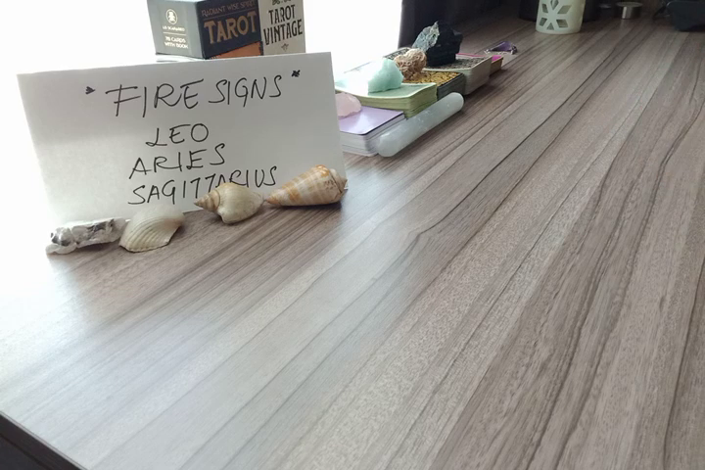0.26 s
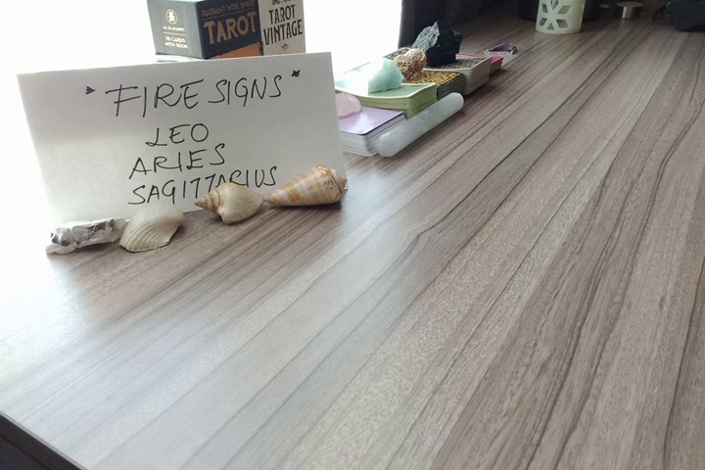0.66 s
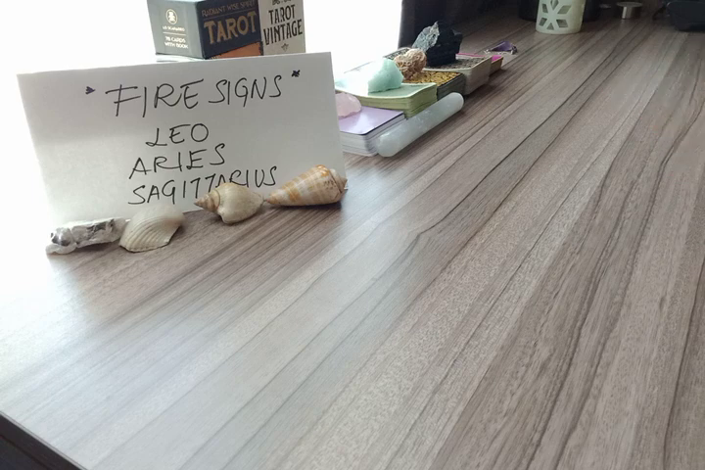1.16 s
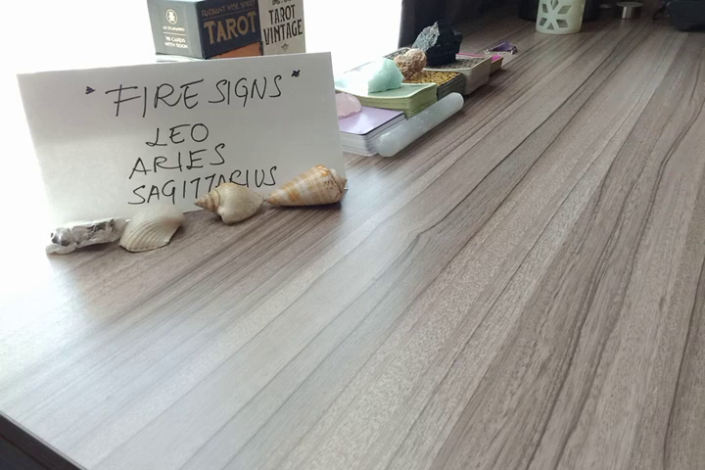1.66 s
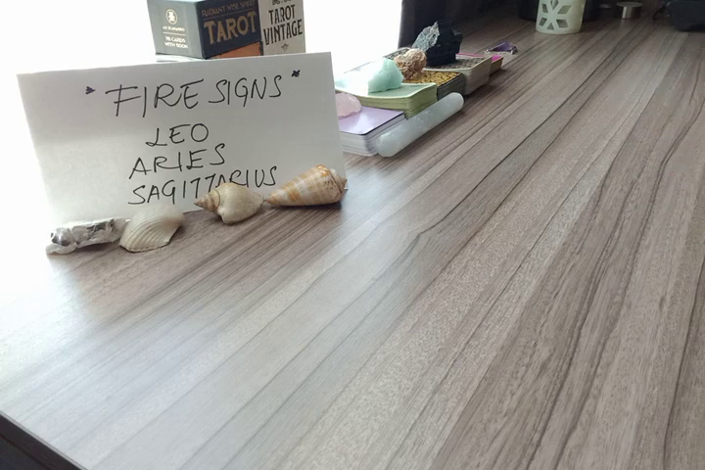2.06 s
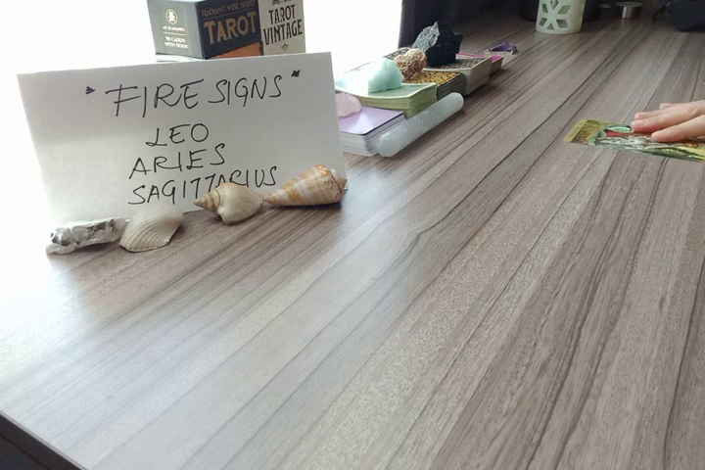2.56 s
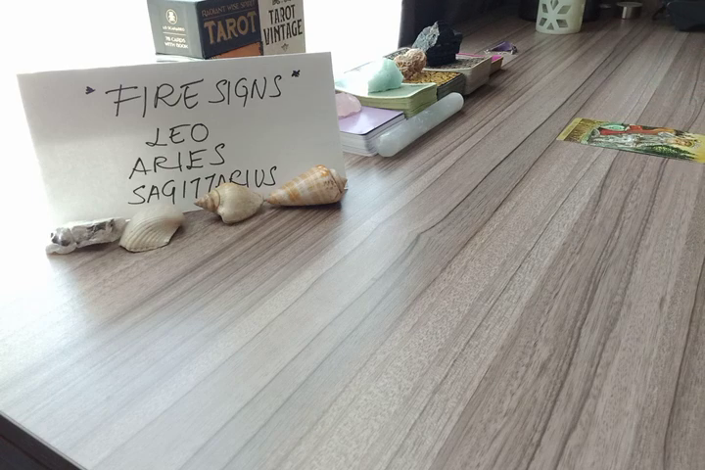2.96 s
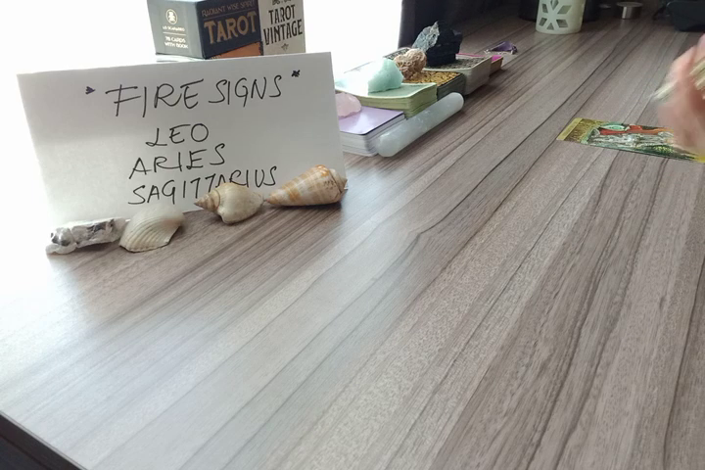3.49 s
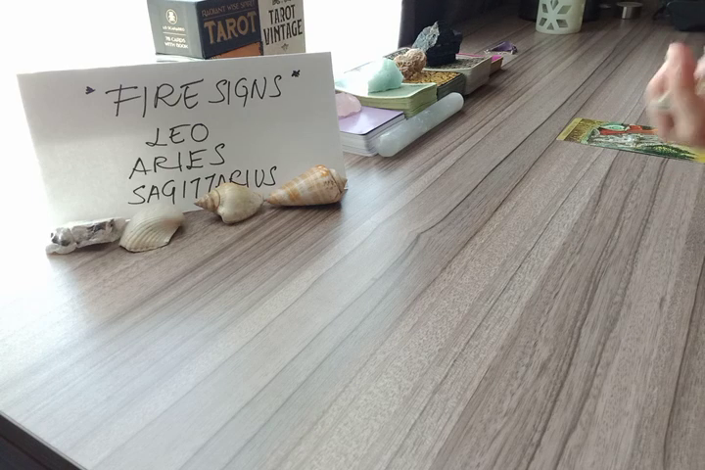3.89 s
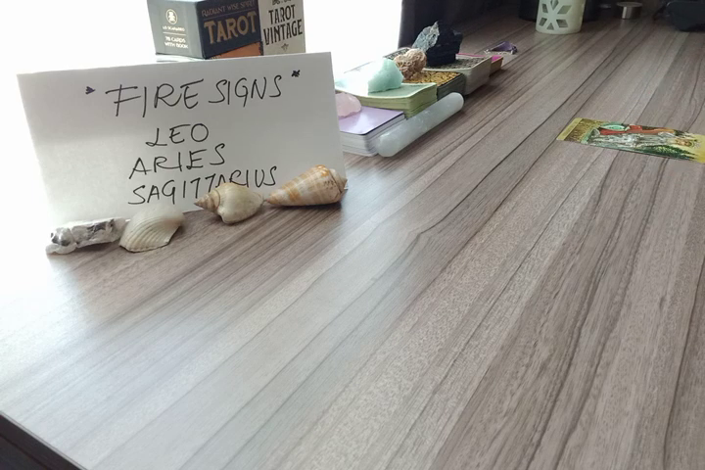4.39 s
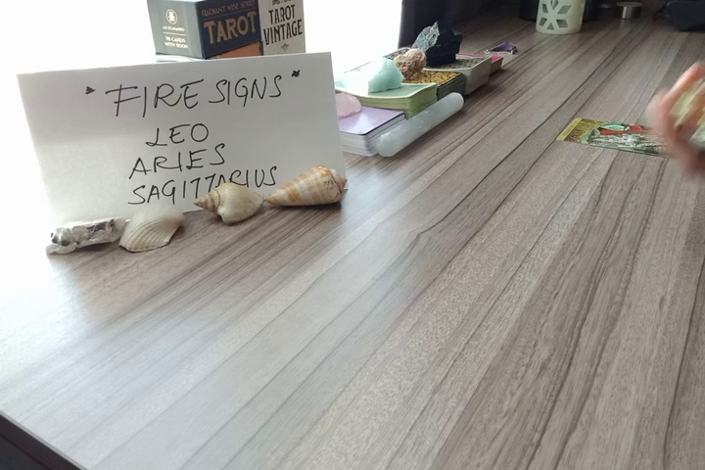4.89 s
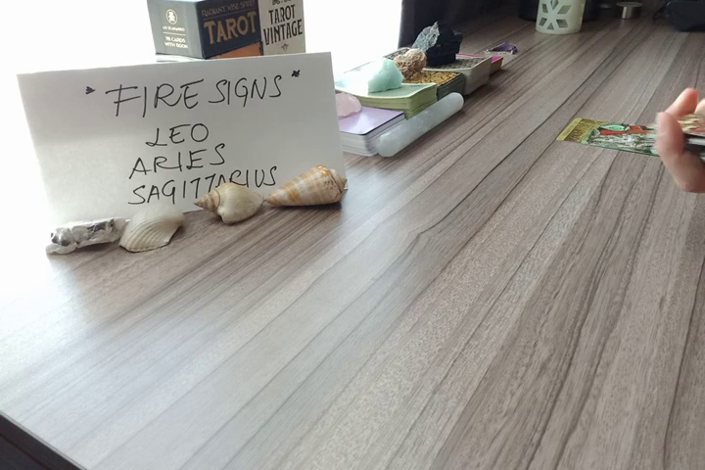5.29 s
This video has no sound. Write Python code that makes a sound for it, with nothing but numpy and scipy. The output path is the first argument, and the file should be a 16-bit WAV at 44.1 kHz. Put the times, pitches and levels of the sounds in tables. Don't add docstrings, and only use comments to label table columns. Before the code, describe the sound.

Stiff cards are shuffled in packets with sharp snaps and soft papery slides, one card laid on a wooden table, in a quiet room.

```python
import sys
import numpy as np
from scipy import signal
from scipy.fft import rfft, irfft, next_fast_len
from scipy.io import wavfile
from scipy.ndimage import uniform_filter1d

SR = 44100
rng = np.random.default_rng(int(sys.argv[2]) if len(sys.argv) > 2 else 0)


def voltage_ratio(level):
    return 10 ** (np.asarray(level, float) / 20)


def log_audio(samples):
    frames = np.atleast_2d(samples).T
    limited = np.clip(frames, -1, 1)
    pcm = np.round(limited * 32767).astype(np.int16)
    wavfile.write(sys.argv[1], SR, pcm)


N = 244314

# t/s, peak level/dB, card ring f/Hz, thud re peak/dB, crack re peak/dB
LANDINGS = [(0.1803, -18, 3300, -22, -2), (0.1813, -13.5, 2500, -25, -5), (0.3431, -22, 2420, -11, -7),
            (0.7105, -30.5, 4700, -24.5, -1), (0.7401, -25, 2550, -14, -3), (1.138, -35, 5930, -37, 7),
            (1.14, -14, 2600, -15, -13), (1.184, -26.5, 3180, -10, -7), (2.1741, -17.5, 3730, -14.5, -2.5),
            (2.3496, -23.5, 2930, -10, -7), (2.356, -24.5, 3380, -17, -5), (2.417, -26, 2945, -9, -3),
            (3.7791, -23.5, 4000, -13, 2), (3.9757, -27, 2880, -15.5, -7), (4.0294, -21, 2900, -14, -1),
            (4.154, -25.5, 2700, -5.5, 1.5), (4.5014, -9, 2770, -19, -16), (4.5053, -27, 7500, -13, 4),
            (4.8458, -26, 2900, -9.5, 3), (4.8557, -23, 2300, -9.5, -10), (5.181, -19, 3200, -20, -5),
            (5.1831, -18, 2230, -6, -13), (5.1864, -27, 3500, -10, -3), (5.5362, -28.5, 2330, -6.5, -9),
            (5.5392, -29, 2800, 1.5, 0)]
LANDING_T60_S = 0.0064
# t/s, peak level/dB, card ring f/Hz, thud re peak/dB
TICKS = [(0.136, -36, 5070, -24), (0.1488, -41, 3700, 0), (0.3348, -32.5, 3740, -4.5),
         (0.337, -37, 4600, -8), (0.4708, -45, 5130, -26), (0.5387, -40, 3300, -9.5),
         (0.8978, -30.5, 4670, -12), (1.3453, -42, 3300, 1), (1.3884, -44, 2700, -9),
         (2.335, -33.5, 3550, -4.5), (3.786, -30, 2690, -11), (3.807, -38, 3520, -23),
         (3.9545, -46, 5000, -29), (4.358, -42, 3320, -7), (4.684, -38, 7800, -34),
         (4.7032, -37, 3350, -13), (4.776, -46, 5730, -20), (4.8505, -24, 2830, -2),
         (5.0363, -35.5, 5100, -6.5), (5.283, -50, 4980, -27), (5.4283, -46, 6100, -26),
         (5.535, -26, 4150, -9.5), (0.1825, -21.5, 1980, -20), (0.1845, -28, 4900, -23),
         (0.191, -28.5, 1990, -13), (0.196, -36, 2600, -14), (4.4996, -33, 2800, -20),
         (4.503, -22, 7500, -24), (4.515, -35, 5000, -15), (2.178, -31, 4200, -16), (4.1605, -39, 5500, -8),
         (4.168, -38, 3800, -14), (5.367, -49, 2680, -14), (5.484, -52.5, 4500, -25),
         (0.595, -50.5, 3500, -22), (2.049, -53, 2900, -27), (0.7131, -27, 1980, -7.5),
         (4.694, -44, 2200, -6), (5.335, -46.5, 4540, 0), (.7118, -30, 4800, -22), (.7175, -30, 9000, -10),
         (0.7267, -41, 7000, -17), (.887, -45, 2800, -5), (1.163, -37, 5000, -7), (.369, -42, 3000, -5),
         (.3465, -33, 5240, -13)]
TICK_CRACK_DB, TICK_T60_S = -2, 0.0095
# t/s, body level/dB, hiss level/dB, fade/(dB/s)
SETTLES = [(0.0, -57, -59, 210), (0.186, -49, -48, 264), (0.349, -53, -72, 302), (0.719, -51.5, -58, 198),
           (0.879, -57, -64, 225), (1.145, -49, -58.5, 205), (2.181, -61, -74, 140),
           (2.376, -62.5, -70, 135), (2.422, -64, -66, 302), (3.798, -57.5, -69, 240),
           (4.036, -59, -68, 200), (4.172, -62.5, -74, 250), (4.511, -40, -49.5, 441),
           (4.861, -56, -70, 180), (5.191, -43, -48.5, 550)]
SETTLE_RUB_DB = -11.5
# start t/s, fastest t/s, end t/s, rub level/dB, hiss re rub/dB
DRAGS = [(-0.1, 0.0, 0.048, -57, -11), (0.013, 0.08, 0.53, -75.5, 12), (0.18, 0.246, 0.32, -64, -9),
         (0.36, 0.45, 0.7, -74, 8), (0.712, 0.822, 0.98, -70, 7.5), (1.174, 1.31, 1.5, -69.5, 1),
         (1.42, 1.5, 1.76, -80, -4), (3.55, 3.6, 3.7, -79, 1), (1.735, 1.97, 2.035, -65, -2.5),
         (2.036, 2.105, 2.17, -56, 0.5), (2.166, 2.25, 2.4, -77, -6), (2.33, 2.356, 2.427, -55.5, -13),
         (3.33, 3.52, 3.59, -76, 11.5), (3.768, 3.91, 3.91, -71, 14.5), (3.92, 3.967, 4.017, -59, 7.5),
         (4.02, 4.08, 4.3, -74, -3), (4.144, 4.205, 4.3, -69, -9), (4.203, 4.284, 4.32, -73.5, 16.5),
         (4.448, 4.69, 4.8, -67, 1), (4.843, 4.903, 5.28, -67.5, 2.5), (5.18, 5.234, 5.47, -61.5, -5)]
DRAG_ENDS_DB, DRAG_BODY_DB = -15.5, 0.5
# middle t/s, length/s, level/dB, centre f/Hz
FACE_PULLS = [(0.343, 0.013, -47.5, 3320), (0.37, 0.011, -65, 6000), (0.507, 0.0077, -60, 6310),
              (0.583, 0.041, -66.5, 5200), (0.716, 0.008, -46, 3600), (0.864, 0.023, -53.5, 6000),
              (.878, 0.015, -50.5, 9000), (1.334, 0.018, -60, 6250), (1.416, 0.028, -69.5, 4840),
              (2.098, 0.026, -54.5, 4800), (2.122, 0.024, -41.5, 5940), (2.366, 0.024, -50, 4180),
              (3.084, 0.016, -58.5, 5500), (3.1, 0.019, -56.5, 4500), (3.115, 0.016, -59, 3500),
              (3.133, 0.019, -52.5, 5240), (3.151, 0.017, -57, 4550), (4.685, 0.0062, -51.5, 4500),
              (4.024, .005, -53, 3800), (3.677, 0.023, -70, 5530), (3.793, 0.0072, -49, 5810),
              (3.992, 0.012, -73, 5500), (4.165, 0.014, -49.5, 5230), (4.23, 0.02, -56.5, 5330),
              (4.363, 0.024, -61, 4280), (4.385, 0.02, -63.5, 3980), (4.418, 0.026, -63, 3646),
              (4.972, 0.02, -52, 8000), (5.003, 0.006, -63, 4670), (5.021, .004, -60, 5000),
              (5.045, .006, -61, 3500), (3.92, .04, -64, 6000), (3.997, .006, -60, 5000),
              (5.063, 0.016, -63, 4500), (5.285, 0.011, -50.5, 6640), (5.311, 0.02, -52, 6500),
              (5.329, .016, -52, 9000)]
# middle t/s, length/s, level/dB, centre f/Hz
EDGE_PULLS = [(0.142, 0.012, -44.5, 7140), (0.159, 0.0076, -53, 4230), (0.226, 0.052, -60, 6500),
              (0.474, 0.015, -55, 6900), (1.126, 0.016, -56, 5470), (1.733, 0.018, -67, 6040),
              (1.972, 0.013, -71, 6500), (2.055, 0.019, -82, 3830), (2.14, 0.02, -45, 7140),
              (3.44, 0.018, -68, 5700), (3.522, 0.053, -66.5, 7160), (3.959, 0.013, -43, 7800),
              (3.978, 0.0044, -41, 4550), (4.273, 0.015, -64, 7380), (4.948, 0.01, -55.5, 7200),
              (5.497, 0.0074, -65.5, 6550), (2.414, .006, -50, 7000), (4.862, 0.0092, -47.5, 8470),
              (5.44, 0.065, -66.5, 5040), (4.712, .014, -61.5, 3580), (4.611, 0.014, -59, 7500),
              (4.635, .015, -67, 8500), (.349, .008, -54, 10000), (3.165, .025, -67, 5000)]
# middle t/s, length/s, level/dB, centre f/Hz
CORNER_PULLS = [(1.942, 0.1, -82, 2700), (2.08, 0.063, -58, 2830), (2.122, 0.012, -46, 7500),
                (5.009, .022, -64, 8100), (5.013, .014, -62, 3200), (5.06, .012, -64, 2700),
                (5.438, .01, -66, 3000), (3.872, 0.018, -74, 2890), (4.297, 0.011, -58, 6700),
                (4.388, 0.041, -68, 3260), (5.431, 0.011, -64, 6030)]
FACE_OCTAVES, EDGE_OCTAVES, CORNER_OCTAVES = 2.28, 1.43, 0.43
# t/s, peak level/dB, f/Hz
THUMPS = [(.714, -35, 600), (.72, -39, 328), (1.14, -32.5, 620), (1.14, -27, 1200), (1.144, -36.5, 155),
          (2.1745, -27.5, 836), (2.417, -46.5, 700), (3.7795, -30, 794), (3.782, -33, 203),
          (3.782, -36, 328), (4.03, -34.5, 790), (4.502, -37.5, 280), (4.5115, -33.5, 770),
          (4.5116, -39, 1080), (4.8555, -36, 403), (4.8555, -32, 770), (.889, -51, 650), (.149, -39, 760),
          (2.36, -40, 520), (5.188, -25, 600), (5.188, -25.5, 1060), (5.188, -39, 275)]
THUMP_T60_CYCLES = 16
# t/s, peak level/dB, f/Hz, t60/s
RINGS = [(0.182, -34, 4870, .05), (.343, -36.5, 1980, 0.046), (4.153, -30, 6300, 0.014),
         (4.154, -35, 4300, 0.018), (4.03, -30, 3000, 0.022), (2.174, -25, 8600, 0.015),
         (2.174, -32, 11700, .01), (2.178, -51, 8600, 0.22), (2.18, -47.5, 1970, 0.21),
         (2.164, -47, 2340, .04), (2.1757, -23, 1930, 0.021), (3.863, -51, 2730, 0.14),
         (4.033, -37, 2050, 0.08), (4.03, -52, 2490, 0.44), (4.504, -34.5, 2529, 0.26),
         (2.18, -51, 3730, 0.2), (4.5015, -16, 6500, 0.013), (4.503, -32, 560, .03),
         (4.505, -46, 2400, .25), (.19, -36, 1900, .05), (1.1385, -32, 5300, 0.013), (.866, -50, 3000, .1),
         (4.51, -44, 4900, 0.23), (4.869, -47, 1850, 0.19), (4.867, -47, 1530, 0.23),
         (5.201, -43, 1600, 0.28), (5.2, -52, 3700, .06)]
# f/Hz, t60/s
ROOM_DECAY = [(300, 0.37), (1200, 0.37), (2550, 0.34), (5000, 0.33), (12000, 0.43)]
ROOM_DB = -14.5
# t/s, level/dB
HORN = [
    (5.04, -73),
    (5.075, -54.5),
    (5.11, -56.5),
    (5.2, -57.5),
    (5.26, -75),
    (5.33, -61),
]
# pitch f/Hz, list of harmonic levels 1 to 6/dB
REEDS = [
    (500, [0, -15, -9, -19, -24, -30]),
    (412, [-5, -9, -17, -26, -19, -21]),
]
OVERTONES_LAG_S = 0.032
# f/Hz, level/dB
BACKGROUND = [(95, -20), (160, -5.5), (250, -7.5), (400, -12.5), (630, -17), (1000, -22), (1350, -26.5),
              (1650, -34), (2100, -38.5), (3200, -39.5), (4200, -35), (7000, -34), (12000, -37.5),
              (15500, -37.5)]
BACKGROUND_DB = -61
# f/Hz, width/Hz, level re swell/dB
RUMBLE = [(61.6, 12.6, -1.5), (73.7, 14.6, 3.5), (120.6, 14.5, 1.5), (137.34, 11.8, 2.5)]
# t/s, level/dB
TRAFFIC = [(0.0, -55), (0.54, -56), (1.19, -58.5), (1.48, -56.5), (1.88, -62), (2.04, -56.5), (4.55, -58.5),
           (4.86, -58), (5.08, -59), (5.54, -59)]
TREBLE_END_HZ = 15780


def rms_one(x):
    return x / np.sqrt(np.mean(x ** 2) + 1e-20)


def peak_one(x):
    return x / np.max(np.abs(x))


def band(x, low_hz, high_hz, order=2):
    return signal.sosfilt(signal.butter(order, [low_hz, high_hz], "band", fs=SR, output="sos"), x)


def resonance(x, hz, width_hz):
    r = np.exp(-np.pi * width_hz / SR)
    zeros = np.array([1, 0, -1]) * (1 - r * r) / 2
    return signal.lfilter(zeros, [1, -2 * r * np.cos(2 * np.pi * hz / SR), r * r], x)


def at_hz(points, hz):
    table_hz, values = np.transpose(points)
    return np.interp(np.log(hz + 1), np.log(table_hz), values)


def drift(rate_hz):
    r = np.exp(-2 * np.pi * rate_hz / SR)
    return rms_one(signal.lfilter([1], [1, -2 * r, r * r], rng.standard_normal(N + SR))[SR:])


def snaps():
    size, lead = 2048, 80
    out = np.zeros(N + size)
    t = np.arange(size) / SR
    after_s = t - lead / SR
    rows = [(*row, LANDING_T60_S) for row in LANDINGS]
    rows += [(*row, TICK_CRACK_DB, TICK_T60_S) for row in TICKS]
    for s, db, hz, thud_db, crack_db, t60_s in rows:
        noise = rng.standard_normal((3, size))
        shape = voltage_ratio(np.where(after_s < 0, -21 + 9000 * after_s, -60 * after_s / t60_s))
        clicks = noise[0] * (np.abs(noise[0]) > 1.9) * shape * 0.3
        clicks[lead] = 1.9
        flutter = clicks + 0.14 * noise[1] * shape ** 0.48
        ring = band(resonance(flutter, hz, 570), 0.49 * hz, 8150)
        card = peak_one(ring + 0.36 * band(flutter, 2370, 5180))
        crack = peak_one(resonance(flutter, 4900, 2400) + 1.83 * band(flutter, 4170, 9460))
        air = t / 0.0013 * np.exp(-t / 0.0039)
        thud = peak_one(band(noise[2] * air + 0.16 * clicks, 310, 1310))
        i = round(s * SR) - lead
        out[i:i + size] += voltage_ratio(db) * (0.66 * card + voltage_ratio(crack_db) * crack + 0.54 * voltage_ratio(thud_db) * thud)
    return out[:N]


def slides():
    t = np.arange(N) / SR
    power = np.zeros((3, N))
    for s, body_db, hiss_db, fade_db_per_s in SETTLES:
        after = slice(round(s * SR), round(s * SR) + SR // 2)
        levels_db = np.array([[body_db + SETTLE_RUB_DB], [hiss_db], [body_db]])
        power[:, after] += voltage_ratio(levels_db - fade_db_per_s * (t[after] - s)) ** 2
    for start, fastest, end, rub_db, hiss_db in DRAGS:
        during = (t >= start) & (t <= end)
        speed_db = np.interp(t[during], np.sort([start, fastest, end]), [DRAG_ENDS_DB, 0, DRAG_ENDS_DB])
        power[:, during] += voltage_ratio(rub_db + speed_db + np.array([[0], [hiss_db], [DRAG_BODY_DB]])) ** 2
    grip = voltage_ratio(1.0 * drift(78) + 2.0 * drift(380))
    slips = rng.standard_normal(N) * grip
    rub = rms_one(band(slips, 2420, 6600) + 0.5 * resonance(slips, 3800, 530))
    hiss = rms_one(band(slips, 4420, 11100, order=1))
    body = rms_one(band(rng.standard_normal(N) * grip, 274, 2690))
    gains = uniform_filter1d(np.sqrt(power), size=88, axis=1)
    return gains[0] * rub + gains[1] * hiss + gains[2] * body + swishes(slips)


def swishes(slips):
    out = np.zeros(N)
    edges = signal.butter(2, [1700, 14000], "band", fs=SR, output="sos")
    kinds = [(FACE_PULLS, FACE_OCTAVES), (EDGE_PULLS, EDGE_OCTAVES), (CORNER_PULLS, CORNER_OCTAVES)]
    for pulls, octaves in kinds:
        spread = 2 ** (octaves / 2)
        for s, length_s, db, hz in pulls:
            near = np.arange(round((s - 1.5 * length_s) * SR), round((s + 1.5 * length_s) * SR))
            stroke = np.exp(-np.abs((near / SR - s) / (0.55 * length_s)) ** 2.6)
            grain = band(slips[near], hz / spread, min(hz * spread, 0.45 * SR))
            grain = grain + 0.16 * octaves * slips[near]
            out[near] += voltage_ratio(db) * stroke * rms_one(signal.sosfilt(edges, grain))
    return out


def hollows():
    out = np.zeros(N + SR)
    thumps = [(s, db, hz, THUMP_T60_CYCLES / hz) for s, db, hz in THUMPS]
    for s, db, hz, t60_s in RINGS + thumps:
        size = min(16384, round(t60_s * SR) + 256)
        t = np.arange(size) / SR
        kick = np.sin(2 * np.pi * hz * t) * voltage_ratio(-60 * t / min(t60_s, 12.0 / hz))
        scatter = resonance(resonance(rng.standard_normal(size), hz, 0.06 * hz), hz, 0.1 * hz)
        evened = scatter / np.sqrt(uniform_filter1d(scatter ** 2, round(40 * SR / hz)) + 1e-12)
        out[round(s * SR):][:size] += voltage_ratio(db) * (0.8 * kick + 0.35 * evened * voltage_ratio(-60 * t / t60_s))
    return out[:N]


def room(x):
    t = np.arange(SR // 2) / SR
    edges_hz = 200 * 2 ** np.arange(0, 6.6, 0.5)
    white = rng.standard_normal((2, len(t)))
    tail = np.zeros(len(t))
    for k, (low, high) in enumerate(zip(edges_hz, edges_hz[1:])):
        t60_s = at_hz(ROOM_DECAY, np.sqrt(low * high))
        tail += band(white[k % 2], low, high) * voltage_ratio(-60 * t / t60_s)
    tail = tail * np.clip(t / 0.0027, 0, 1)
    return voltage_ratio(ROOM_DB) * signal.fftconvolve(x, tail / np.sqrt(np.sum(tail ** 2)))[:N]


def horn():
    t = np.arange(N) / SR
    tone = np.zeros(N)
    for hz, levels_db in REEDS:
        for k, db in enumerate(levels_db):
            tone += voltage_ratio(db + 0.58 * drift(7.6)) * np.sin(2 * np.pi * hz * (k + 1) * t)
    first = np.sin(2 * np.pi * REEDS[0][0] * t)
    s, level_db = np.transpose(HORN)
    late = np.clip((t - s[1]) / OVERTONES_LAG_S, 0, 1)
    return (first + late * (tone - first)) * voltage_ratio(np.interp(t, s, level_db, left=-140, right=-140))


def background():
    t = np.arange(N) / SR
    size = next_fast_len(N)
    colour = voltage_ratio(at_hz(BACKGROUND, np.arange(size // 2 + 1) * SR / size))
    out = voltage_ratio(BACKGROUND_DB) * rms_one(irfft(rfft(rng.standard_normal(size)) * colour, size)[:N])
    s, level_db = np.transpose(TRAFFIC)
    swell_db = np.interp(t, s, level_db) - 5.5
    for hz, width_hz, db in RUMBLE:
        boom = resonance(resonance(rng.standard_normal(N + SR), hz, width_hz), hz, 2.0 * width_hz)[SR:]
        out = out + voltage_ratio(db + swell_db) * rms_one(boom)
    motor = resonance(resonance(rng.standard_normal(N), 527, 10), 510, 4.0)
    passing = np.exp(-((t - 2.62) / 0.25) ** 2)
    return out + voltage_ratio(-74) * passing * rms_one(motor)


def scene():
    hits, rings, rub = snaps(), hollows(), slides()
    reverb = room(hits + 0.4 * rings + 0.63 * rub)
    mono = hits + rings + rub + reverb + horn() + background()
    return np.array([mono, mono])


def top_cut(x):
    return signal.sosfilt(signal.butter(12, 16600, fs=SR, output="sos"), x)


def record(dry):
    imbalance = voltage_ratio(-33) * band(dry[0], 250, 5000) * drift(4.3)
    own = band(imbalance + voltage_ratio(-84.5) * rng.standard_normal(N), 260, 22000)
    low_pass = signal.ellip(10, 0.5, 60, TREBLE_END_HZ, fs=SR, output="sos")
    x = signal.sosfilt(low_pass, dry + own * [[1], [-1]])
    x = signal.sosfilt(signal.butter(4, 38, "high", fs=SR, output="sos"), x)
    return top_cut(x)


dry = scene()
out = record(dry)
log_audio(out)
```